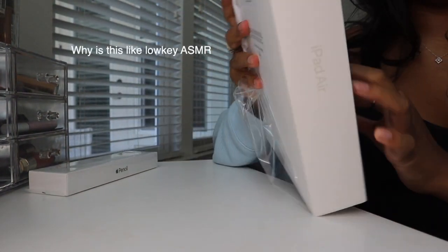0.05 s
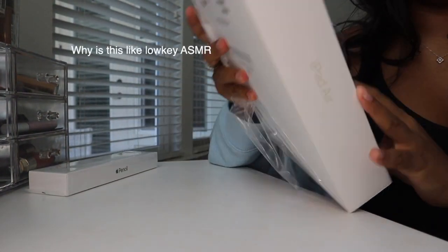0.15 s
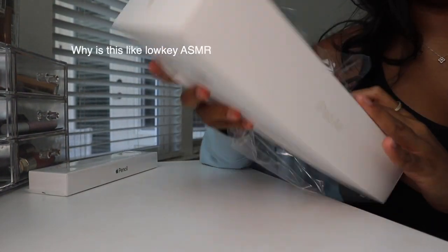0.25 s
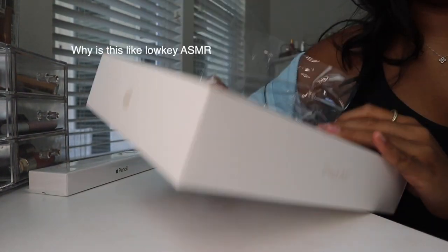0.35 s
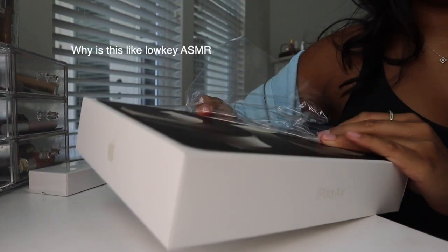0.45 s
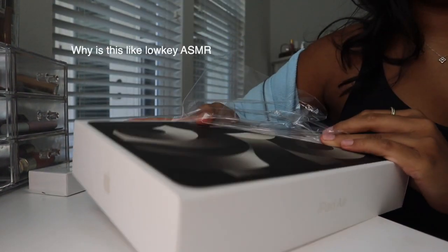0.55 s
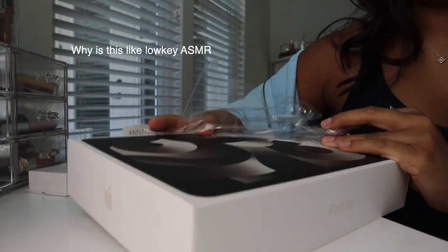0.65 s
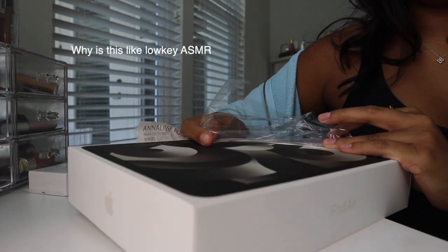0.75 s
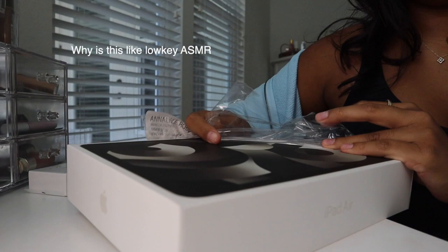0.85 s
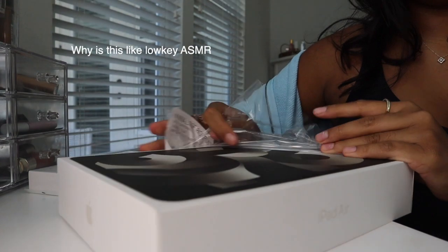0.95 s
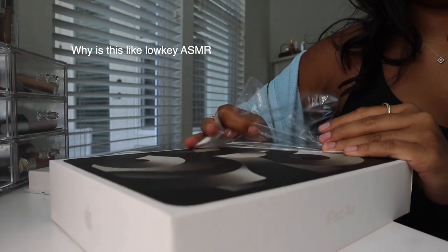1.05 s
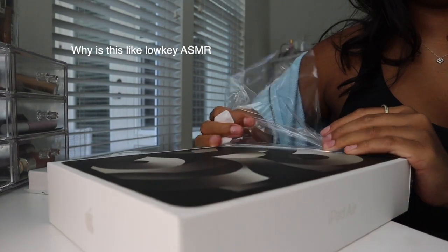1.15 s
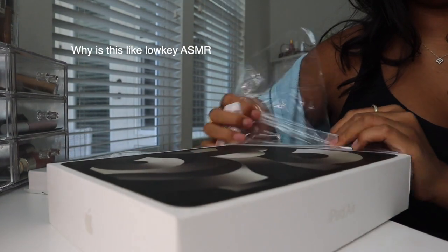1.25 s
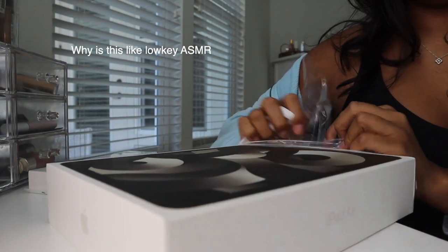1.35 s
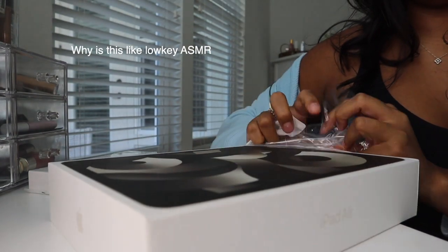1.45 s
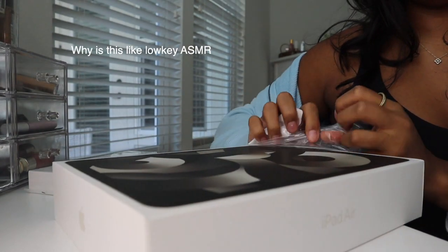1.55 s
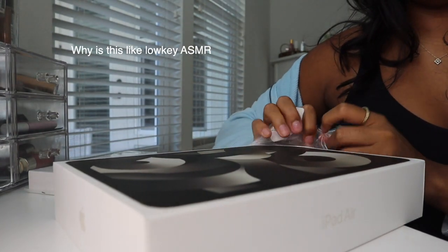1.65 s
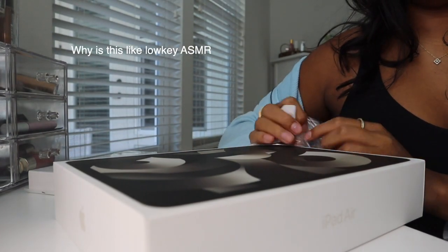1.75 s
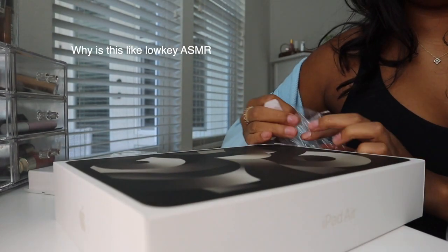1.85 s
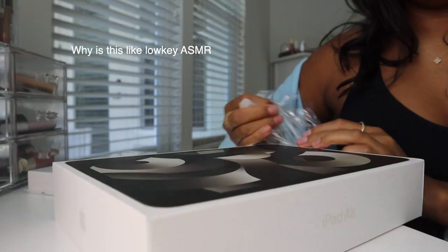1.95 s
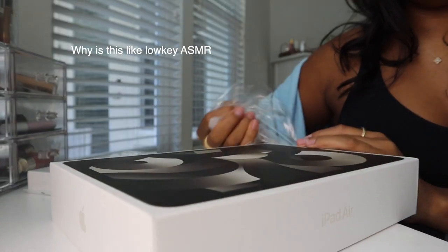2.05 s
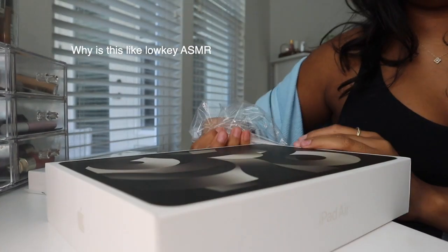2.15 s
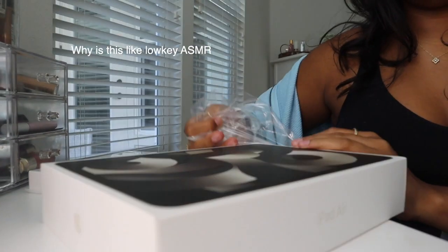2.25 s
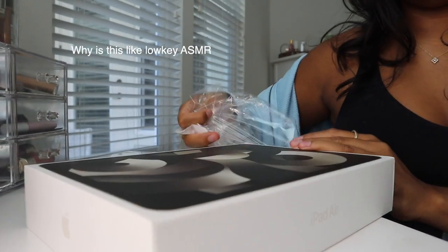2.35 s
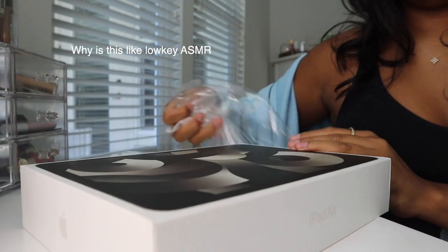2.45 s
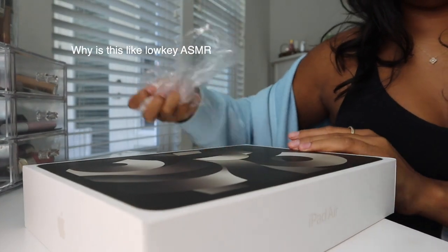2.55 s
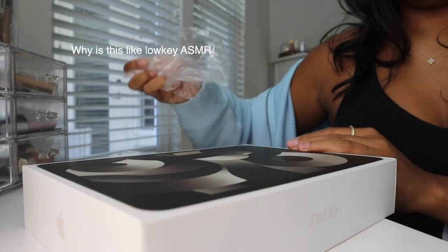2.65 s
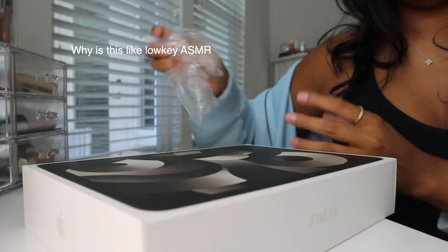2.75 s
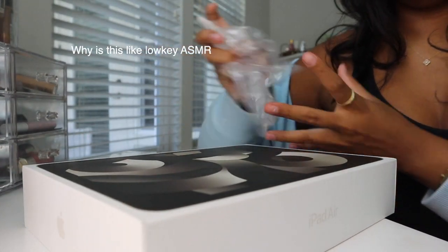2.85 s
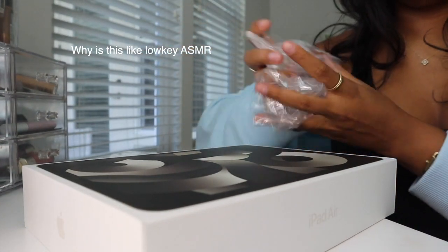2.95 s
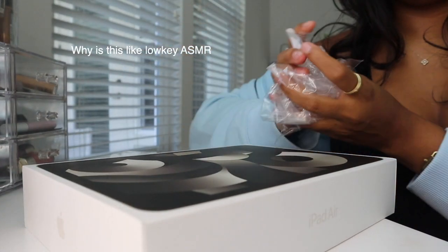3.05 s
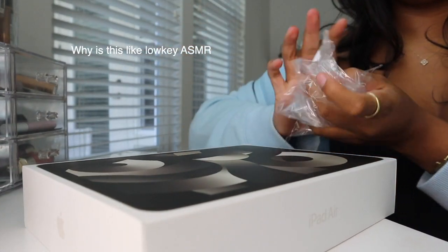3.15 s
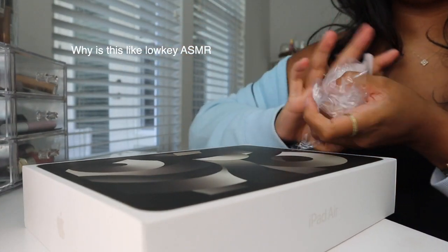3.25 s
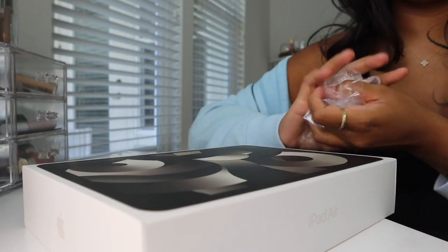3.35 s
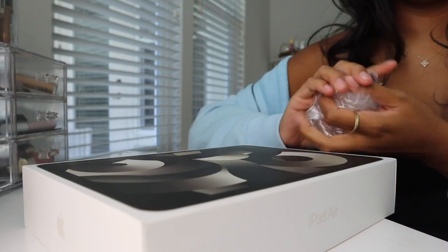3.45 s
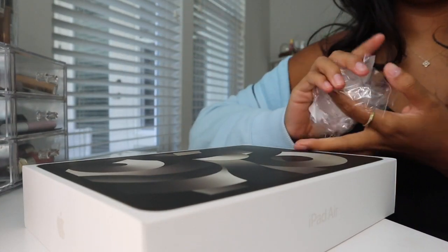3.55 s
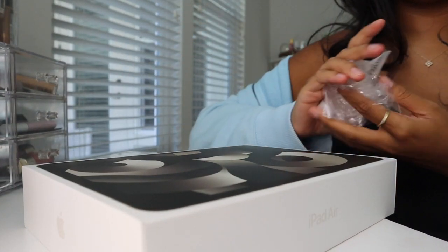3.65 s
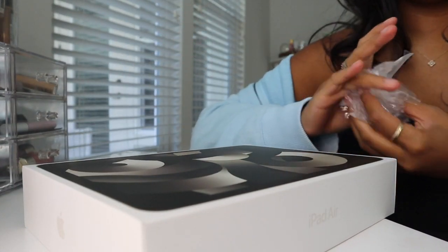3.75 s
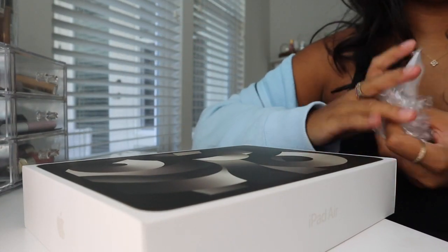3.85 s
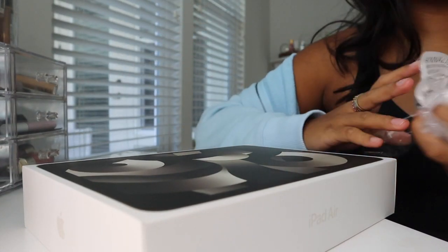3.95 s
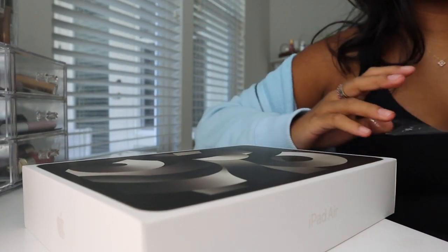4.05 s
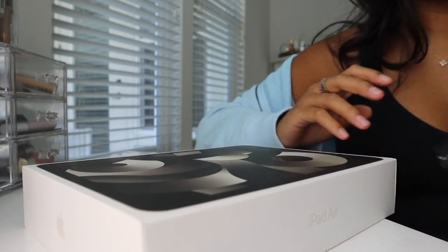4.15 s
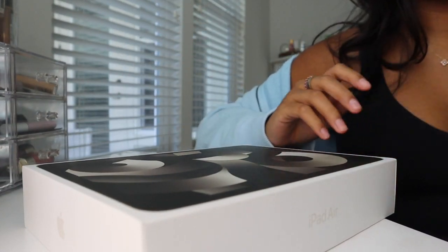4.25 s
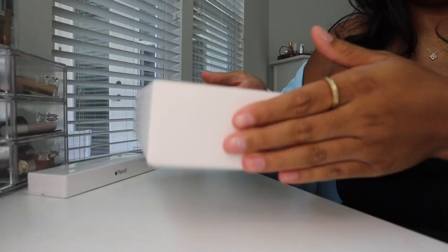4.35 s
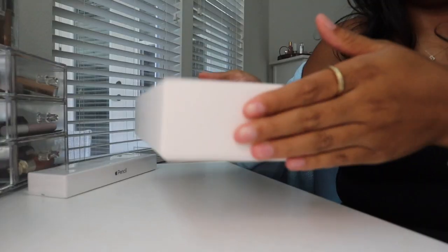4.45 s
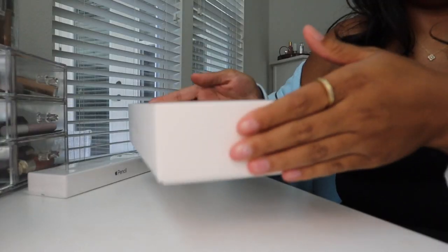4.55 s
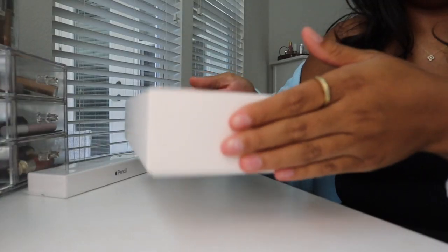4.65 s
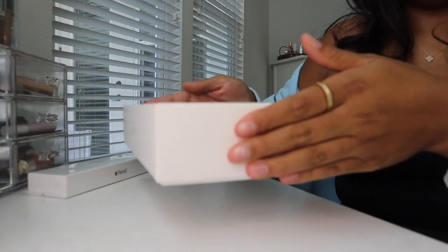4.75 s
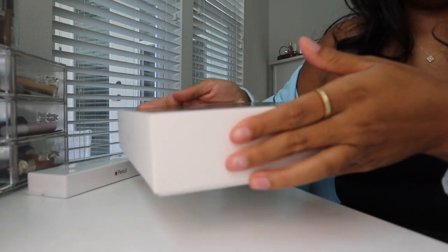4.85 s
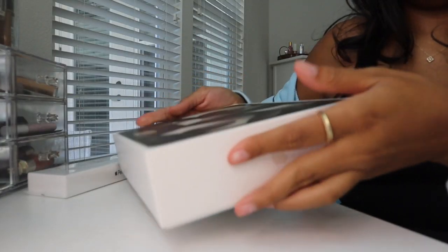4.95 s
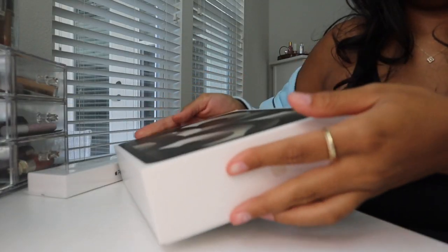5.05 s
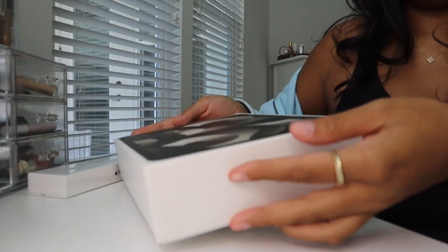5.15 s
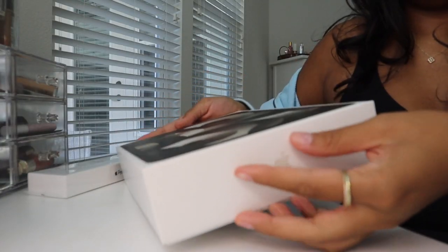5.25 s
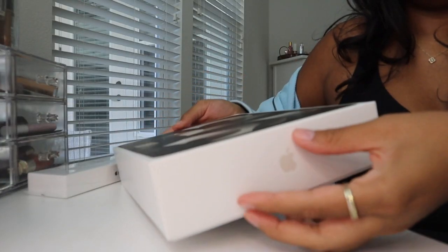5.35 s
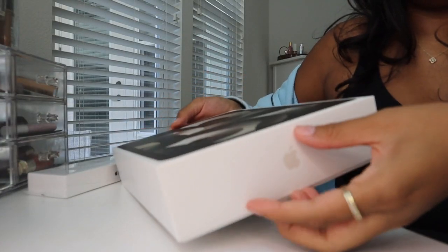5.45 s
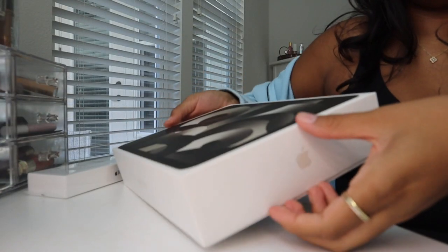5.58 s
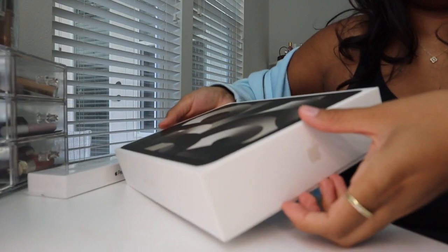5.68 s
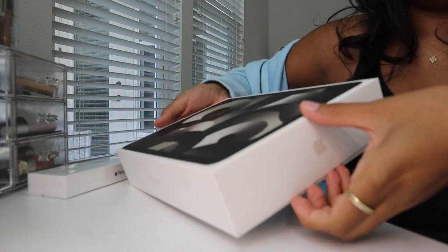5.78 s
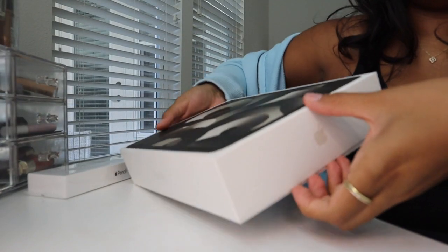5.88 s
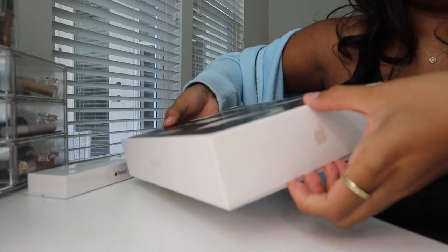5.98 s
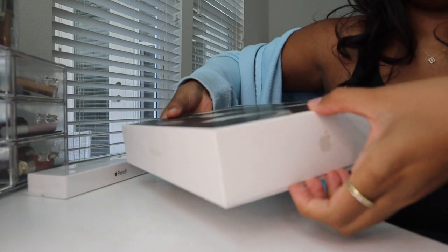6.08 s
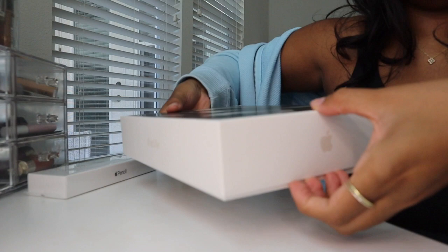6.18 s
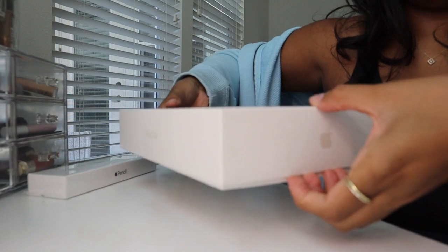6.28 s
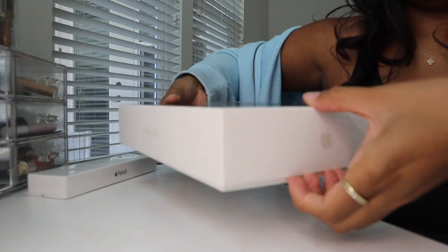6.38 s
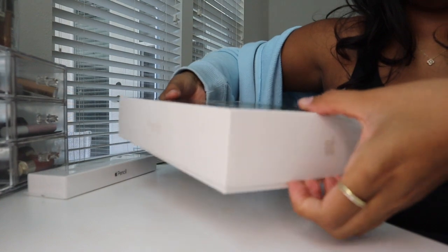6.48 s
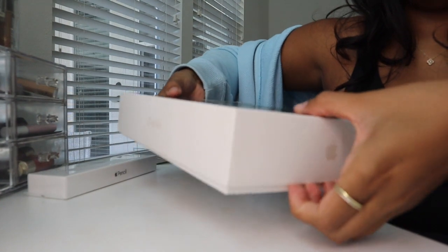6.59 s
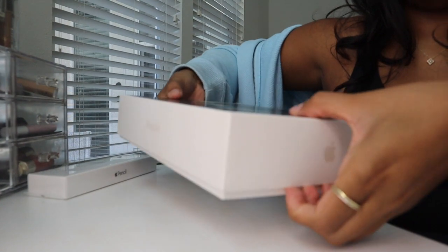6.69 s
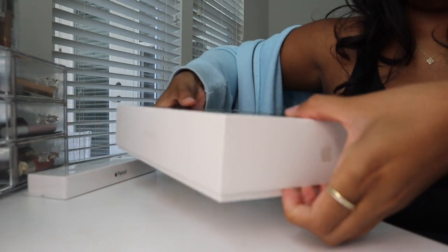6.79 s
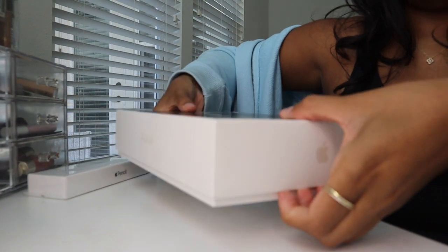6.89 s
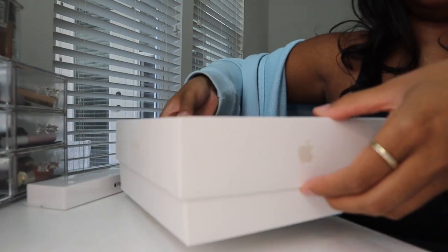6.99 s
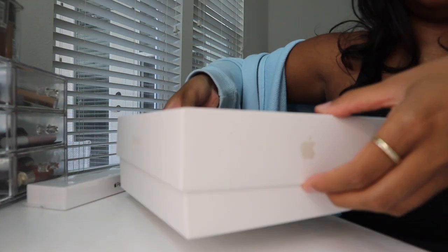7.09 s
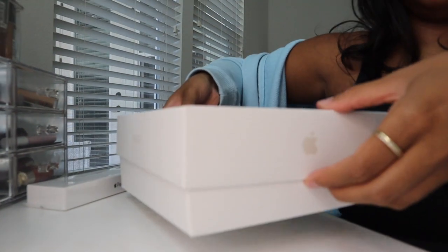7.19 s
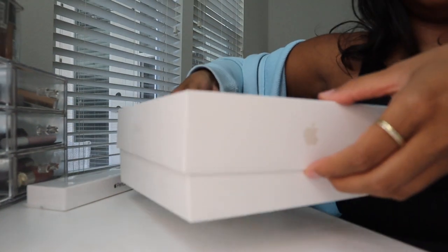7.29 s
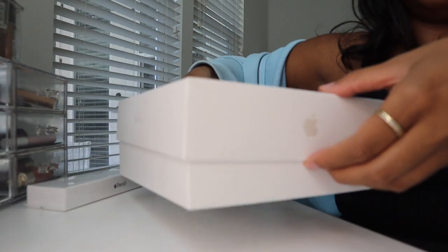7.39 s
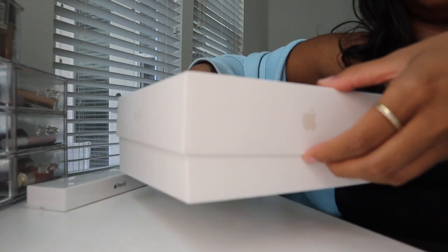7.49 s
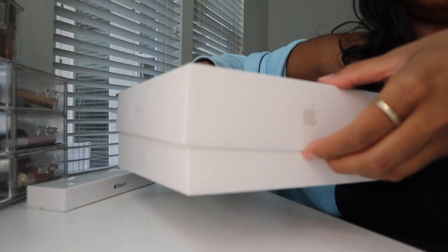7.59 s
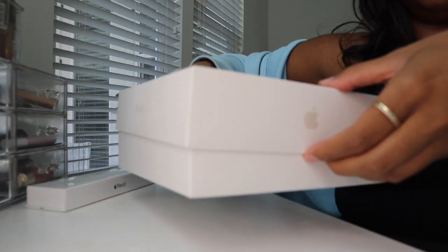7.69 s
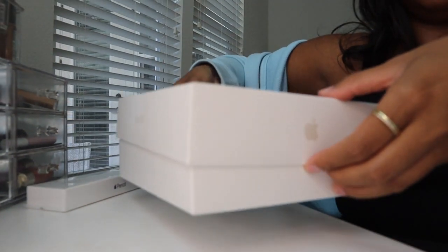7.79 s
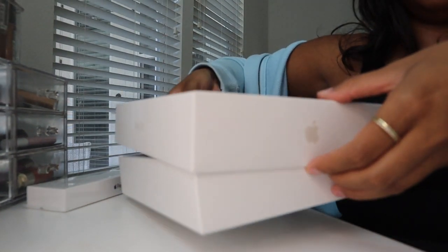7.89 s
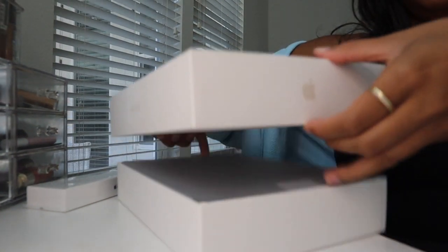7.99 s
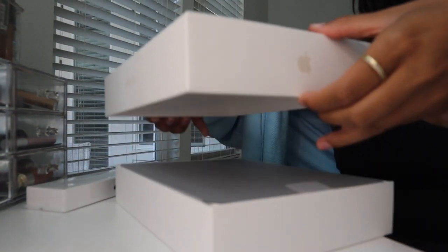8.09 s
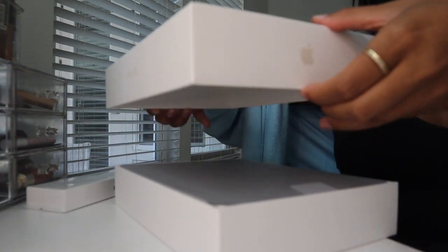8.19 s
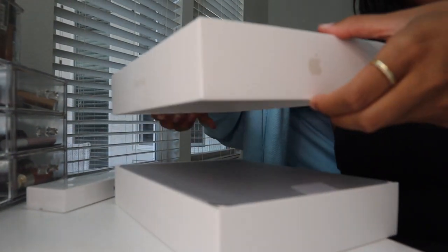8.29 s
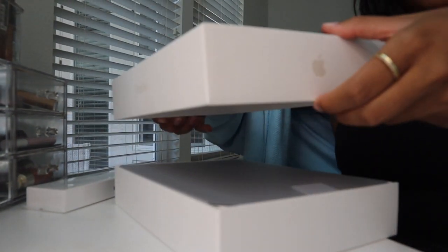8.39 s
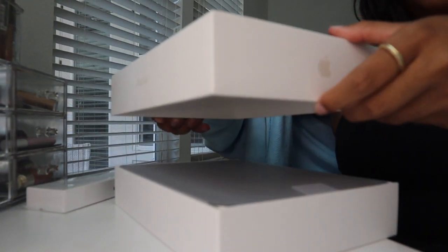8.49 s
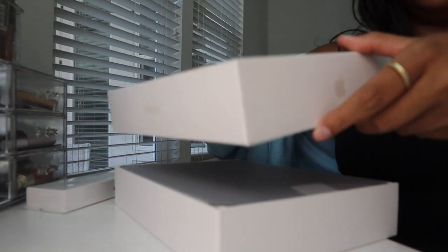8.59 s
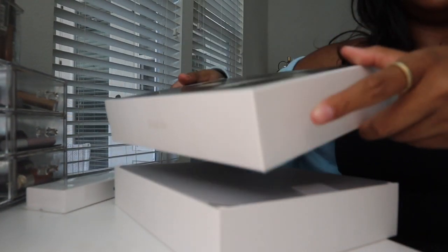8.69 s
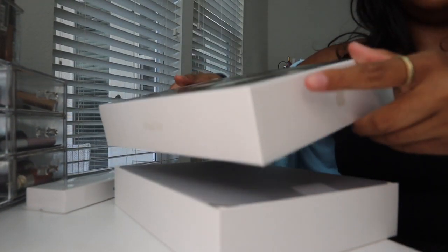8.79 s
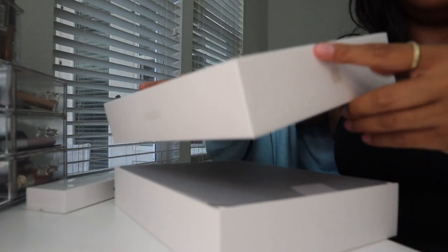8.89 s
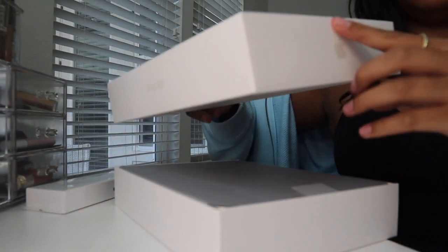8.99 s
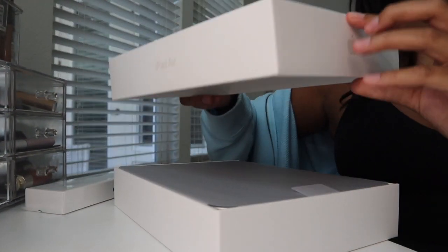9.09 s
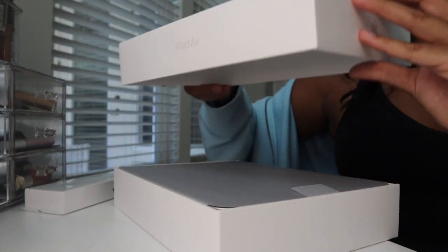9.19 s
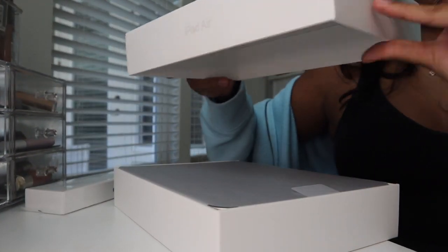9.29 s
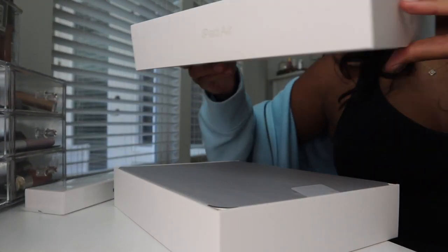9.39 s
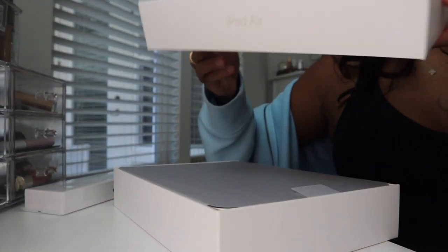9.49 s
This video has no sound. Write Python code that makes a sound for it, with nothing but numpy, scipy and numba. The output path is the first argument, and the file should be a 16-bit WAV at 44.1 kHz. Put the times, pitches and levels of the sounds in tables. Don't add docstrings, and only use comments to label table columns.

```python
import sys
import numpy as np
from scipy import signal
from scipy.fft import rfft, irfft, next_fast_len
from scipy.io import wavfile
from scipy.ndimage import uniform_filter1d, map_coordinates
from numba import njit

SR = 44100
rng = np.random.default_rng(int(sys.argv[2]) if len(sys.argv) > 2 else 0)


def to_linear_factor(level_db):
    exponent = np.asarray(level_db, float) / 20
    return 10 ** exponent


def int16_out(signal):
    q = np.round(np.clip(np.atleast_2d(signal).T, -1, 1) * 32767)
    wavfile.write(sys.argv[1], SR, q.astype(np.int16))


N = 420273

# f/Hz, level/dB, t60/s
DESK = [(78, -50, 0.092), (107.5, 7, 0.29), (119.4, 8.5, 0.33), (193.2, 3, 0.19), (227, -9, 0.035)]
# f/Hz, level/dB, t60/s
WALLS = [(294.5, -5, 0.047), (329, 1, 0.033), (365.4, -3, 0.073), (388, 2.5, 0.056), (411, 7.5, 0.024),
         (471.7, 6, 0.03), (531.5, -2.5, 0.05), (560, -3, 0.065)]
# f/Hz, level/dB, t60/s
EDGE = [(733, -5, 0.021), (823, 5, 0.021), (970, 2, 0.029), (1230, -2, 0.041), (1500, -4.5, 0.013),
        (1860, -11, 0.042), (2180, -8, 0.024)]


def film():
    # peak t/s, level/dB, swell by 10 dB/s, fade by 10 dB/s, brightness/dB
    pulls = [(.035, -29.5, .2, .04, 3.5), (.105, -30, .03, .035, -7), (.16, -35, .05, .06, -8),
             (.303, -34, .015, .03, -2.5), (.37, -40, .1, .06, -6), (.51, -28, .025, .03, -1),
             (.56, -34, .05, .1, -2), (.67, -36, .1, .13, -2), (.975, -35.5, .1, .06, 1),
             (1.07, -36.5, .05, .5, 3), (1.37, -31, .13, .23, -.5), (1.59, -32.5, .03, .1, -9),
             (1.75, -34.5, .38, .52, 2.5), (1.94, -32.5, .05, .12, .5), (2.33, -33, .03, .07, -2),
             (2.45, -34.5, .12, .04, 1), (2.535, -26.5, .0755, .05, 3.5), (2.82, -29.5, .09, .05, 1.5),
             (3.02, -27, .09, .6, -.5), (3.51, -27.5, .14, .07, -6.5), (3.575, -27.5, .04, .05, -10),
             (3.745, -30, .04, .6, -9), (3.86, -29, .03, .1, -16), (3.96, -27, .1, .22, -14),
             (4.1, -31, .03, .08, -12), (4.2, -35, .04, .05, 5), (4.253, -31, .01, .015, 7),
             (4.295, -26.5, .04, .02, 3)]
    # t/s, left minus right/dB
    held_at = [(0.0, -3), (0.86, 1), (1.8, -1.5), (2.82, 2.0), (3.11, -1), (4.3, -5.5), (4.4, -1)]
    return crackle(pulls, (0, 4.42), held_at, rest_db=-55, spread_db=3.1, patchy_db=1.8, keep=.4)


def rustle():
    # peak t/s, level/dB, swell by 10 dB/s, fade by 10 dB/s, brightness/dB
    brushes = [(4.44, -53, 4.5, .15, -13), (4.9, -61, 1, .9, -10), (5.52, -56, .3, .5, -7),
               (6.83, -52, .004, .05, -8), (7.55, -59, .4, .22, -12), (8.05, -60, .3, .05, -17),
               (8.68, -56.5, .1, .42, 0), (9.3, -65.5, .3, .4, -1)]
    return crackle(brushes, (4.42, 9.53), [(5, -.5)], rest_db=-66, spread_db=1.6, patchy_db=2., keep=.6)


def crackle(table, span, places, rest_db, spread_db, patchy_db, keep, count=50000):
    # f/Hz, level per Hz/dB
    film_colour = [(400, -18.5), (800, -2), (1500, -1), (2300, -0.5), (4200, 1.5), (7000, -1.5),
                   (11000, -0.5), (12500, -1.5), (14500, -25), (16000, -16)]
    db, air_db = swells(table, rest_db)
    sharp_db = -1.5 + 0.11 * air_db
    u = rng.random((count, 5)).T
    s = span[0] + u[0] * (span[1] - span[0] - .01)
    early = s[s < 2.9] if s.min() < 2.9 else s
    bursts = rng.choice(early, count // 60)
    joined = np.arange(count // 3)
    s[joined] = bursts[joined % len(bursts)] + .0012 * u[4, joined]
    hz = 600 * 25 ** u[1]
    spread_db = spread_db * np.interp(s, [2.6, 3.], [1.1, .65])
    size = to_linear_factor(np.minimum(-spread_db * (1 + np.log(u[2])), 12)) * hz / 3000
    field = rng.standard_normal((9, int(span[1] * 14) + 3))
    size = size * to_linear_factor(patchy_db * 1.5 * map_coordinates(field, [u[1] * 8, s * 14], order=1))
    aim = np.interp(s, *np.transpose(places)) / 5 + 1.4 * (2 * u[3] - 1)
    t60 = 8. * (1 + u[4]) / hz
    grains = colour(rings(s, hz, t60, size, aim, 0.22 / hz), film_colour)
    below = [signal.sosfiltfilt(signal.butter(2, split_hz, fs=SR, output="sos"), grains)
             for split_hz in (3000, 7000)]
    parts = below[0], below[1] - below[0], grains - below[1]
    active = slice(int(s.min() * SR), int(s.max() * SR))
    body, sharp, top = (p / np.std(p[0, active]) for p in parts)
    air_db = np.array([air_db, keep * air_db + (1 - keep) * np.mean(air_db)])
    return to_linear_factor(db + patchy_db * walk(40)) * (body + to_linear_factor(sharp_db) * sharp + to_linear_factor(air_db) * top)


def creases():
    # t/s, peak level/dB, f/Hz
    loud_creases = [(0.045, -18, 2040), (0.2597, -21.5, 4200), (0.3003, -22.5, 2360), (0.4031, -24, 3000),
                    (0.4778, -46, 1660), (0.5062, -10, 5200), (0.577, -11, 10700), (0.9251, -21, 5850),
                    (1.035, -23.5, 3820), (1.1039, -13.5, 4360), (1.1558, -19.5, 4220), (1.1967, -21, 4860),
                    (1.244, -16, 5000), (1.3644, -4, 5700), (1.537, -25, 4500), (1.5811, -10.5, 3220),
                    (1.6744, -33, 2850), (1.934, -14.5, 4190), (1.9577, -16, 4250), (1.9911, -8.5, 2050),
                    (2.255, -24, 3970), (2.3732, -13.5, 2020), (2.5214, -16.5, 4170), (2.7944, -11, 2240),
                    (2.9013, -15, 10700), (2.9827, -19.5, 3100), (3.5055, -11, 4280), (3.7894, -26.5, 2180),
                    (4.2747, -10, 4050)]
    # t/s, peak level/dB, f/Hz
    small_creases = [(.8113, -45, 4500), (.8537, -40, 3890), (.8906, -28, 5350), (.8951, -33, 4200),
                     (1.168, -21, 4200), (1.2568, -15, 3580), (1.476, -20, 2500), (1.4938, -25, 3880),
                     (1.5551, -29, 4750), (1.76, -21, 4000), (1.8829, -20, 2500), (1.9233, -15.5, 2060),
                     (2.063, -18, 5000), (2.1577, -28, 3730), (2.3124, -3.5, 2500), (2.722, -21, 4230),
                     (2.7354, -41, 2080), (3.349, -16.5, 3100), (3.574, -17.5, 4250), (3.7955, -13.5, 3440),
                     (3.849, -28, 2020), (3.8584, -20, 2180), (4.2216, -38, 2500), (4.278, -27, 1300),
                     (4.293, -15, 1220), (4.306, -12, 1300), (4.319, -14, 5960), (.104, -16, 2500),
                     (.031, -13, 7000), (2.7781, -23, 2310), (3.7429, -19, 2100), (3.7798, -27, 2070),
                     (4.2502, -22, 2660), (1.188, -20, 4000), (1.298, -18, 3000)]
    # t/s, peak level/dB, f/Hz
    ticks = [(4.4787, -26, 2090), (4.8614, -21, 6700), (4.9566, -28, 2250), (4.9916, -31, 1600),
             (5.2914, -45, 1500), (5.5308, -30, 1590), (5.5967, -46, 2270), (6.534, -36.5, 5000),
             (6.8054, -28, 1500), (7.7897, -26.5, 4500), (7.9134, -43, 2220), (7.9289, -17, 1740),
             (8.5769, -35, 1510), (8.8957, -48.5, 1610), (9.3811, -13.5, 4220), (9.4225, -24.5, 2860)]
    return snaps(loud_creases, 4.4, 2.85) + snaps(small_creases, 2.3, 2.34) + snaps(ticks, -5, 1.65)


def snaps(table, gain_db, octaves, count=8):
    s, db, hz = (np.repeat(c, count) for c in np.transpose(table))
    u = rng.random((len(table), count, 4)).reshape(-1, 4).T
    late = .001 * u[0] ** 3
    place = (np.arange(len(s)) % count + u[1]) / count
    hz = np.clip(hz * 2 ** (octaves * (place - .3)), 800, 14000)
    size = to_linear_factor(db + gain_db - 10800 * late)
    return rings(s + .0008 + late, hz, 7 / hz, size, 1.86 * u[2] - 1.2, .5 / hz)


def folds(count=2500):
    # start t/s, length/s, f/Hz, level/dB
    air_folds = [(2.72, 0.14, 2300, -36), (2.77, 0.021, 2350, -26.5), (2.8, .08, 2110, -35.5),
                 (3.002, 0.87, 1840, -40.5), (3.47, 0.11, 4550, -32), (3.716, 0.1, 2090, -35),
                 (3.88, .2, 1990, -35), (4.259, 0.069, 3880, -31)]
    # start t/s, length/s, f/Hz, level/dB
    card_rings = [
        (6.533, .004, 2850, -37.5),
        (7.915, 0.064, 4640, -42),
        (8.27, .09, 1000, -61),
    ]
    out = 0
    for s, length, hz, db in air_folds + card_rings:
        u = rng.random((int(count * length), 4)).T
        size = to_linear_factor(db - 2.5 * np.log(u[1])) * np.sin(np.pi * u[0])
        pitch = hz * (1 + 0.24 * (u[2] - .5))
        out = out + rings(s + length * u[0], pitch, 22. / pitch, size, 1.4 * u[3] - 1.6, 1 / pitch)
    return out


def box_blows():
    # t/s, peak level/dB, desk bass/dB, hardness/dB, ring freedom (0-1.5)
    flat_knocks = [(.027, -14.5, 6.5, -26, 0.62), (.272, -21, -35, -32, 0.9), (.427, -5, -4, -2, 0.66),
                   (.633, -7, -13, -6, 0.75), (1.004, -14, -10.5, -37, 0.9), (1.958, -17.5, -13, 1.5, 0.95),
                   (2.313, -16.5, -14, 10, 0.7), (2.372, -19, -11, -9, 1), (2.534, -11, -6, -14, 0.53),
                   (3.515, -21, -1, -19.5, 1), (4.393, -19.5, -23, 3, 0.84), (4.424, -17, -31, -25, 0.48),
                   (4.439, -14, -30, -25, 0.4), (4.578, -14.5, -32, -27, 0.65), (5.0868, -12, -8, -20, 0.6),
                   (5.306, -13, -9, -24.5, 0.39), (6.8255, -22.5, -21, 5, 0.7),
                   (7.026, -23.5, -22, -27, 0.03), (7.9852, 0.5, -17, -11, 0.9),
                   (8.022, -1, -14, -10, 0.74), (7.9805, -15, -15, -9, .5), (8.0845, -19.5, 6.5, -23, 1),
                   (9.213, -24.5, -21, 0, 0.16)]
    # t/s, peak level/dB, hardness/dB
    light_taps = [(.406, -26.5, 1), (.504, -20, -21), (1.257, -25, 2), (1.359, -20, -13), (1.582, -23, 4),
                  (1.989, -21, -10), (2.058, -27, 5), (2.099, -25.5, -4), (2.124, -24, -5),
                  (4.466, -24.5, -29), (4.556, -27, -22), (4.679, -24, -3), (5.246, -34, -5),
                  (5.551, -30.5, -6), (7.017, -30.5, -28), (7.038, -33, -21), (9.065, -37.5, 9.5)]
    # t/s, peak level/dB, desk bass/dB, hardness/dB, ring freedom (0-1.5)
    edge_knocks = [
        (5.087, -5, -40, -32.5, 0.97),
        (5.306, -6, -39, -37, 0.95),
        (8.0855, -7, -40, -25, 0.3),
    ]
    # t/s, peak level/dB, desk bass/dB, hardness/dB, ring freedom (0-1.5)
    settles = [(4.48, -29, -31, -36, 0.3), (4.564, -19, -30, -25, 0.7), (4.59, -21, -30, -40, 0.4),
               (4.696, -27, -20, -15, 0.65)]
    # f/Hz, level/dB, t60/s
    tilted = [(111, -0.5, 0.19), (127, -5, 0.083), (189, -1, 0.17), (211, -8, 0.042), (278, 0, .07),
              (307, -3.5, .1), (349, 5, 0.057), (379, 0, 0.081), (424, -3, 0.12), (468, 1, 0.093),
              (519, -7, 0.12), (657, -5, 0.037)]
    taps = [(s, db, -14, hard_db, 0.88) for s, db, hard_db in light_taps]
    return knocks(flat_knocks + taps, WALLS) + knocks(edge_knocks, tilted) + knocks(settles, WALLS)


def knocks(table, walls):
    s, db, bass_db, crack_db, free = np.transpose(table)
    edge_db = -3.5 + 0.39 * crack_db
    lifted_s = 5
    push = np.sign(s - lifted_s)[:, None]
    out = 0
    for modes, share_db, side in ((DESK, bass_db - 10.0, .8), (walls, 0 * db - 8, .5), (EDGE, edge_db - 3.0, -.5)):
        hz, mode_db, t60 = np.transpose(modes)
        u = rng.standard_normal((len(s), 3, len(hz)))
        size = to_linear_factor((db + share_db)[:, None] + mode_db + 1.5 * u[:, 0])
        start = s[:, None] + 0.22 / hz * abs(u[:, 2])
        pitch = hz * (1 + 0.017 * u[:, 1])
        ring = [start, pitch, t60 * free[:, None], push * size, side + 0 * size, 0.39 / hz + 0 * size]
        out = out + rings(*(r.ravel() for r in ring))
    u = rng.random((len(s), 3, 16))
    hz = 1500 * 8 ** u[:, 0]
    size = to_linear_factor((db + crack_db)[:, None] - 1.5 - 5.8 * u[:, 1]) * (hz / 3000) ** -.6
    crack = [s[:, None] + 0.0038 * u[:, 1] ** 2, hz, 4.4 / hz, size, 2 * u[:, 2] - 1.3, 0.23 / hz]
    return out + rings(*(r.ravel() for r in crack))


def thuds():
    # t/s, peak level/dB, f/Hz, t60/s
    pushes = [(.4315, -2, 371.5, 0.067), (.6335, 1, 390, .06), (1.9585, -8.5, 750, 0.023),
              (2.519, -15, 400, 0.063), (4.3945, -16, 560, 0.047), (4.4245, -10, 463, 0.054),
              (4.4365, -8, 312, 0.068), (4.461, -15, 320, 0.07), (4.5785, -7, 460, .04),
              (4.601, -18, 302, 0.076), (5.0868, -1, 440, .035), (5.093, -11, 290, .08),
              (5.3062, -4, 350, .06), (5.3125, -10, 430, .06), (8.0222, -5, 480, .04),
              (6.8265, -17, 560, 0.048), (7.989, -7.5, 198, .09), (5.551, -29, 565, 0.08)]
    s, db, hz, t60 = np.repeat(pushes, 2, axis=0).T
    pitch = hz * (1 + .05 * np.resize([-1, 1], len(s)))
    return rings(s, pitch, t60, to_linear_factor(db - 4), 0.46 + 0 * s, 0.86 / hz)


def cracks(size=8192):
    # t/s, peak level/dB, centre f/Hz, t60/s
    contacts = [(5.0862, -18, 2400, 0.013), (5.089, -35, 1690, .14), (5.3052, -17, 1900, .014),
                (5.308, -30, 1600, .14), (6.8056, -31, 8000, .008), (6.8246, -14, 8500, 0.0097),
                (6.8246, -14, 2600, 0.0098), (6.828, -31, 1500, .13), (7.9852, -14, 1710, 0.014),
                (8.0218, -9, 940, 0.038), (8.0218, -34, 5000, 0.026), (8.0705, -23, 3940, 0.018),
                (1.3644, -7, 6000, 0.009), (1.5811, -16, 2600, .016), (1.9904, -21, 1500, 0.012),
                (2.7945, -16, 2300, 0.018), (3.5054, -9, 4800, 0.0092), (2.3126, -6.5, 2500, 0.0069),
                (1.9579, -8.5, 3000, .007), (5.2925, -36, 4000, .008), (.429, -24, 1000, .12),
                (.635, -25, 1100, .1), (.045, -19, 10000, .012), (2.3728, -14, 3500, .008),
                (1.6746, -18, 6000, .006), (4.3928, -24, 1500, 0.017), (4.6805, -30, 1500, .012)]
    out, t = np.zeros((2, N + size)), np.arange(size) / SR
    for s, db, hz, t60 in contacts:
        noise = band(rng.standard_normal((2, size)), hz, .65 * hz)
        burst = noise / np.std(noise) * to_linear_factor(db - 7 - 60 * t / t60) * np.clip(t / 0.00057, 0, 1)
        start = int(s * SR)
        out[:, start:start + size] += [burst[0], .6 * burst[1] - 0.21 * burst[0]]
    return out[:, :N]


def lid():
    # f/Hz, width/Hz, level/dB
    lid_modes = [(172, 60, 0), (380, 130, 2), (570, 110, 0), (1000, 170, -8), (1650, 140, -19),
                 (2300, 400, -19), (3500, 1300, -7)]
    # f/Hz, width/Hz, level/dB
    squeak = [(584, 41, 0)]
    # peak t/s, level/dB, swell by 10 dB/s, fade by 10 dB/s
    glides = [
        (7.03, -36, .015, .03),
        (7.327, -28, .014, .015),
        (7.745, -30, .015, .04),
        (7.77, -31, .03, .012),
        (7.79, -35, .015, .005),
        (9.215, -38, .008, .03),
    ]
    # peak t/s, level/dB, swell by 10 dB/s, fade by 10 dB/s
    scrapes = [
        (7.925, -31, .011, .1),
        (7.97, -30, .06, .006),
        (8.03, -28, .012, .15),
        (8.13, -29.5, .1, .09),
        (8.31, -50, .1, .08),
    ]
    slip_s, slip_hz, slip_db = (7.311, 7.7), (51, 63), (-26, -28)
    t = np.arange(N) / SR
    creeping = (t > slip_s[0]) & (t < slip_s[1])
    rate = np.interp(t - slip_s[0] - .039, [0, .2], slip_hz)
    turns = np.cumsum(creeping * rate) / SR + .7
    slips = np.flatnonzero(np.diff(np.floor(turns)))[:, None] / SR
    hz, width, db = np.transpose(lid_modes)
    u = rng.standard_normal((len(slips), 2, len(hz)))
    size = to_linear_factor(np.interp(slips, slip_s, slip_db) + db + 5 + 1.8 * u[:, 0])
    ring = [slips + .0004 * u[:, 1], hz + 0 * size, 2.2 / width + 0 * size, size, .5 * u[:, 1], 1 / hz + 0 * size]
    glide = (to_linear_factor(swells(glides)[0]) + creeping * to_linear_factor(-45)) * rub(squeak, 1.2, 60)
    card = [(hz, 5.7 / t60, db) for hz, db, t60 in WALLS + EDGE] + [(3660, 3700, -26)]
    scrape = to_linear_factor(swells(scrapes)[0]) * rub(card, 2.5, 70)
    return glide + scrape + rings(*(r.ravel() for r in ring))


def hands():
    # peak t/s, level/dB, swell by 10 dB/s, fade by 10 dB/s
    grips = [(.02, -33, 8, .2), (.58, -37.5, .1, .1), (1.2, -37, .05, .5), (1.97, -37, .64, .27),
             (2.5, -37, .05, .1), (3.1, -39.5, .44, .47), (4.52, -42, 1, .1), (5.1, -48, 1.5, .4),
             (5.7, -44, .4, .24), (7.55, -42, .7, .3), (8.09, -26.5, .03, .05)]
    # peak t/s, level/dB, swell by 10 dB/s, fade by 10 dB/s
    leans = [(.02, -35, .1, .2), (.58, -34.5, .3, .2), (1.0, -43, 2, 1.9), (1.9, -47, 2.5, .6),
             (2.55, -31.5, .12, .09), (4.54, -41.5, .28, .4), (7.5, -40, .15, .2), (8.0, -39, .05, .3)]
    wall_bands, desk_bands = ([(hz, 2.67 / t60, db) for hz, db, t60 in modes] for modes in (WALLS, DESK))
    walls = to_linear_factor(swells(grips, rest_db=-52.5)[0]) * rub(wall_bands, 2.4, 50)
    return walls + to_linear_factor(swells(leans, rest_db=-49)[0]) * rub(desk_bands, 2.6, 25)


def room():
    # f/Hz, t60/s, level/dB
    registers = [(293, 0.28, -20.5), (1060, 0.14, -26.5), (3040, 0.53, -22), (9200, 0.033, -5.5)]
    t = np.arange(SR // 2) / SR
    onset = np.clip(t / 0.0019 - .5, 0, 1)
    tail = 0
    for hz, t60, db in registers:
        echoes = band(rng.standard_normal((2, len(t))), hz, 1.05 * hz) * to_linear_factor(-60 * t / t60) * onset
        tail = tail + to_linear_factor(db) * echoes * np.sqrt(14 / (t60 * 2 * hz))
    return tail


def air():
    # f/Hz, level per Hz/dB
    tone_colour = [(15, -60), (25, -8.5), (59, 1.5), (93, -15.5), (154, -3), (326, -19), (354, -4.5),
                   (488, -57), (543, -16), (769, -23), (1420, -24), (13100, -61.5), (15000, -71.5)]
    # f/Hz, rms level/dB
    hum_lines = [(59, -52), (152, -46.5), (352, -60.5)]
    tone = colour(rng.standard_normal((2, N)), tone_colour)
    hum = sum(to_linear_factor(db) * unit(band(rng.standard_normal(N), hz, 4.4)) for hz, db in hum_lines)
    return to_linear_factor(-45.5 + 0.54 * walk(1.89)) * tone / np.std(tone[0]) + hum * np.array([[1], [0]])


def thinned_top(mid):
    # start t/s, end t/s
    thin_spells = [(.07, .1), (.14, .25), (.325, .385), (.53, .57), (3.62, 3.635), (3.74, 3.77), (3.83, 4.17),
                   (6.84, 6.905)]
    t, size = np.arange(N) / SR, next_fast_len(N)
    in_spell = sum((t > a) * (t < b) for a, b in thin_spells)
    edges = np.geomspace(6000, 14500, num=8)
    spectrum, bins = rfft(mid, size), np.arange(size // 2 + 1) * SR / size
    for k, (lo, hi) in enumerate(zip(edges, edges[1:])):
        often = .9 if 0 < k < 5 else -.2
        gone = uniform_filter1d(in_spell * (walk(22) < often) * 1., size=300)
        strip = irfft(spectrum * ((bins >= lo) & (bins < hi)), size)[:N]
        mid = mid - .95 * gone * strip
    return mid


def unit(x):
    return x / np.sqrt(np.mean(x ** 2))


def colour(x, points, size=2048):
    hz, db = np.transpose(points)
    grid = np.maximum(np.arange(size // 2 + 1) * SR / size, 1)
    cep = irfft(np.interp(np.log(grid), np.log(hz), db) * np.log(10) / 20)
    cep[1:size // 2] *= 2
    cep[size // 2 + 1:] = 0
    response = irfft(np.exp(rfft(cep))).reshape((1,) * (x.ndim - 1) + (-1,))
    return signal.fftconvolve(x, response, axes=-1)[..., :N]


def band(x, hz, width_hz):
    return signal.lfilter(*signal.iirpeak(hz, hz / width_hz, SR), x)


def walk(rate):
    k = int(SR / rate)
    return 1.3 * uniform_filter1d(np.repeat(rng.standard_normal(N // k + 1), k), k)[:N]


def swells(table, rest_db=-120):
    s, db, rise, fall, *rest = np.transpose(table)[:, :, None]
    t = np.arange(0, N + 64, 64) / SR
    drop_10db = np.where(t < s, (s - t) / abs(rise), (t - s) / abs(fall))
    power = to_linear_factor(2 * db - 20 * drop_10db) + 1e-20
    total = power.sum(0)
    cols = [10 * np.log10(total + to_linear_factor(2 * rest_db))] + [(power * c).sum(0) / total for c in rest]
    return [np.interp(np.arange(N) / SR, t, c) for c in cols]


def rub(modes, rough_db, rate):
    push = rng.standard_normal((2, N)) * to_linear_factor(rough_db * walk(rate))
    out = 0
    for hz, width, db in modes:
        once = band(push, hz, 1.53 * width)
        out = out + to_linear_factor(db) * band(once, hz, 1.53 * width)
    return unit(out)


@njit
def rings(s, hz, t60, size, side, rise):
    out = np.zeros((2, N))
    for e in range(len(s)):
        z, p = size[e] + 0j, np.exp((2j * np.pi * hz[e] - np.log(1000) / t60[e]) / SR)
        held, q = 1., np.exp(-1 / (rise[e] * SR + 1e-9))
        for i in range(int(s[e] * SR), min(N, int((s[e] + t60[e]) * SR))):
            held *= q
            out[0, i] += z.imag * (1 - held)
            out[1, i] += z.imag * (1 - held) * side[e]
            z *= p
    return out


def scene():
    # f/Hz, level/dB
    widening = [(60, -23), (110, -35), (200, -14.5), (380, -14), (700, -2), (1290, -1.5), (2380, 3.5),
                (4400, 4), (8120, 6.5), (15000, 13.5)]
    near = to_linear_factor(-5.0) * film() + to_linear_factor(-4.5) * rustle() + creases() + folds()
    near = near + box_blows() + thuds() + cracks() + lid()
    near = signal.sosfilt(signal.butter(2, 65, "high", fs=SR, output="sos"), near)
    echoes = signal.fftconvolve(near[:1], room(), axes=1)[:, :N]
    mid, side = near + echoes + hands() + air()
    mid = thinned_top(mid)
    side = colour(side, widening)
    return np.array([mid + side, mid - side])


def roll_off(x):
    return signal.sosfilt(signal.butter(12, 15740, fs=SR, output="sos"), x)


def record(dry):
    clipped = np.clip(dry, -1, 1)
    mix = signal.sosfilt(signal.butter(10, 15000, fs=SR, output="sos"), clipped)
    return roll_off(mix)


dry = scene()
out = record(dry)
int16_out(out)
```